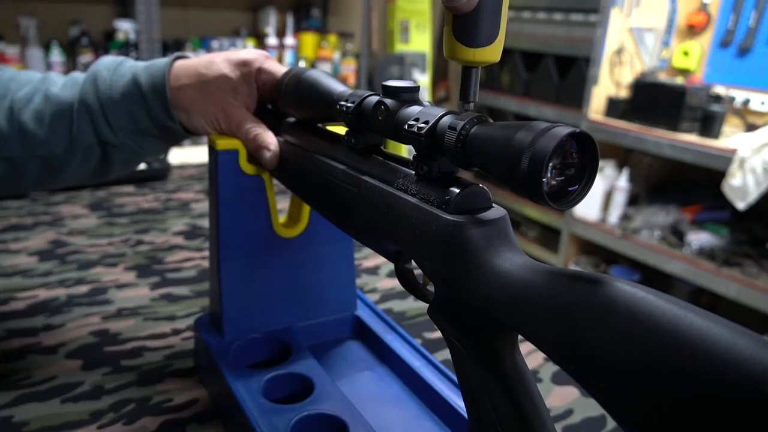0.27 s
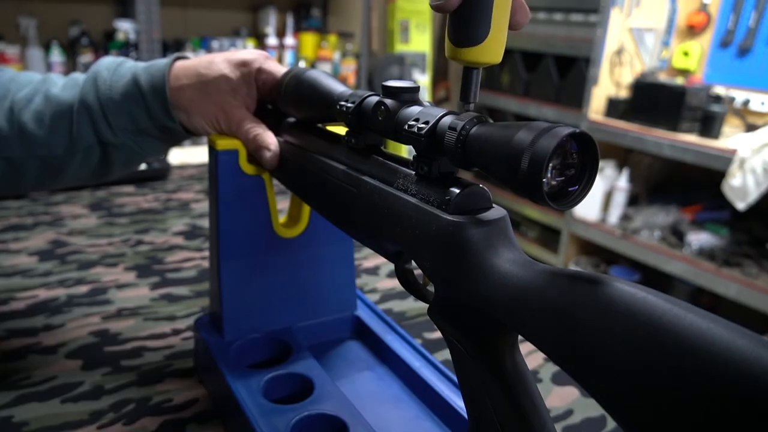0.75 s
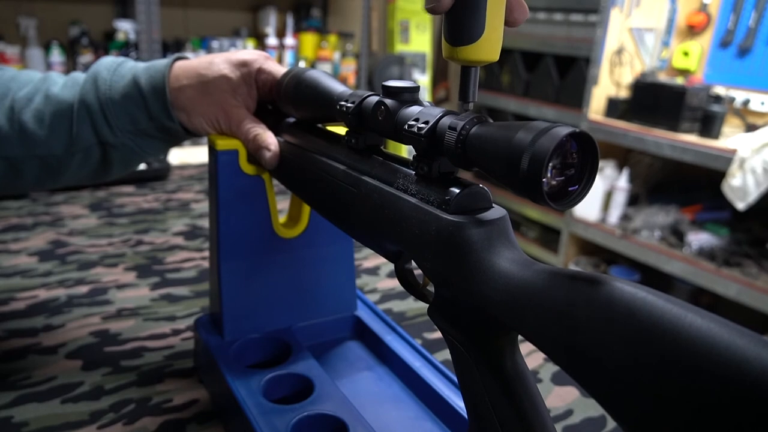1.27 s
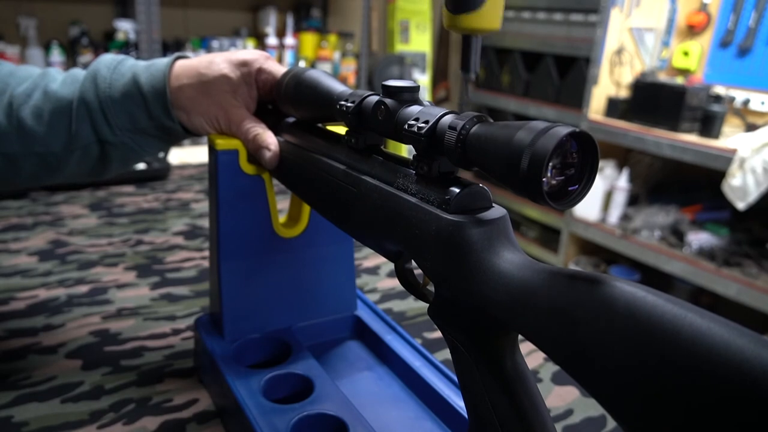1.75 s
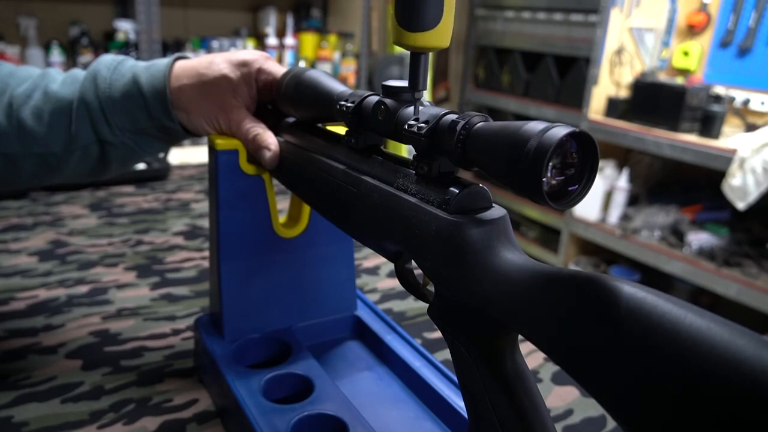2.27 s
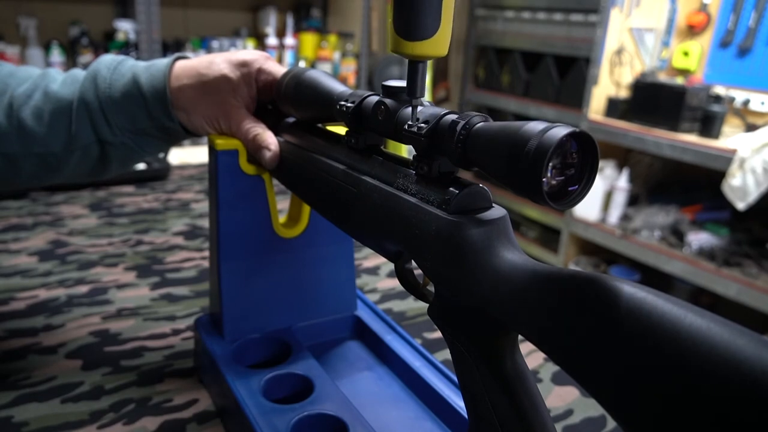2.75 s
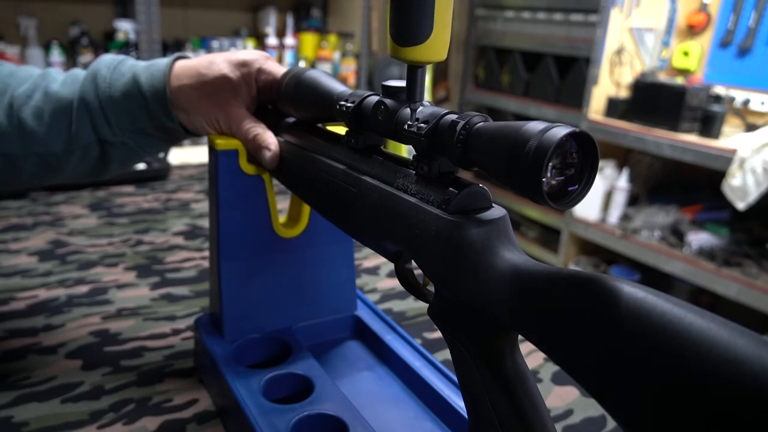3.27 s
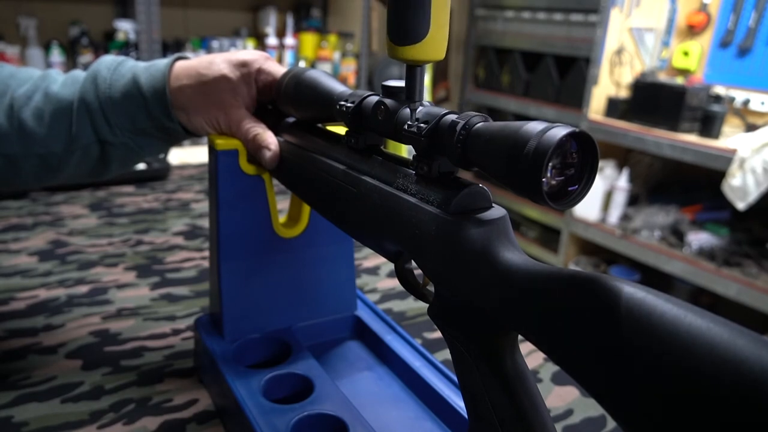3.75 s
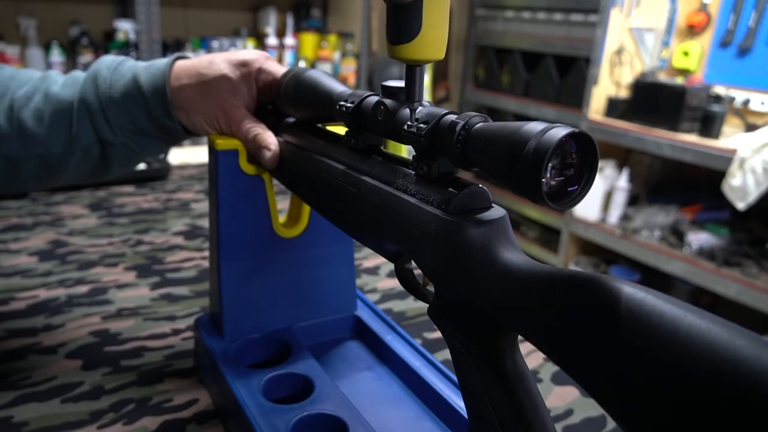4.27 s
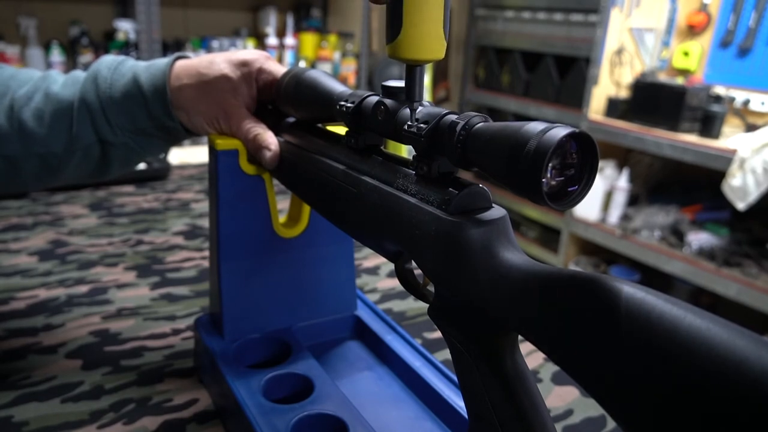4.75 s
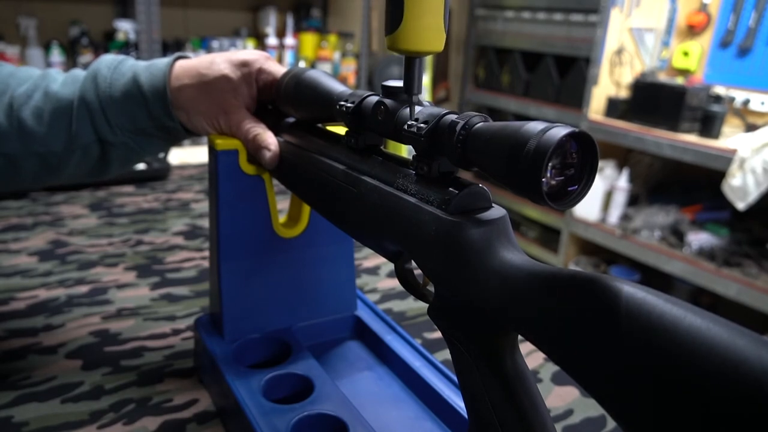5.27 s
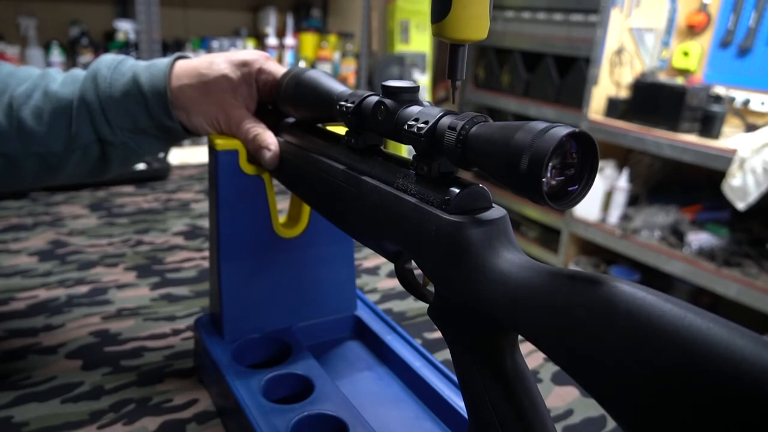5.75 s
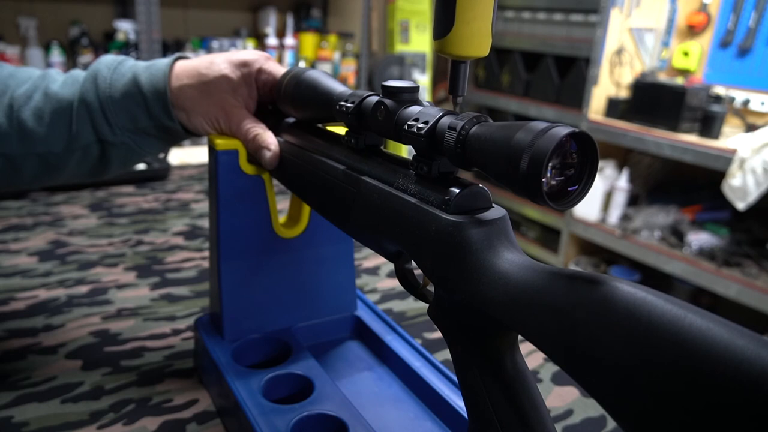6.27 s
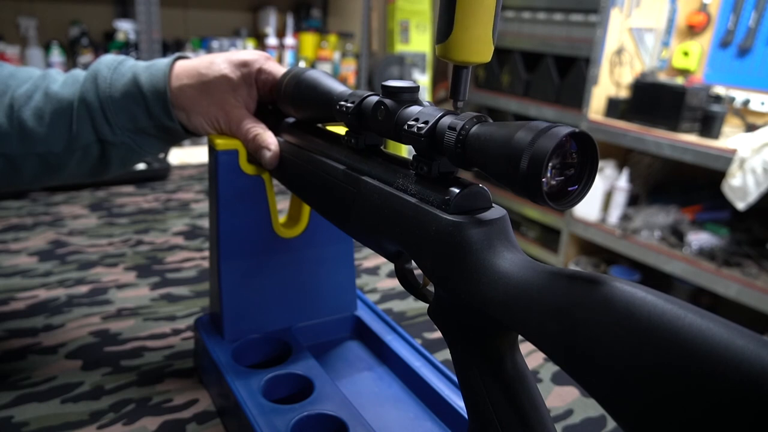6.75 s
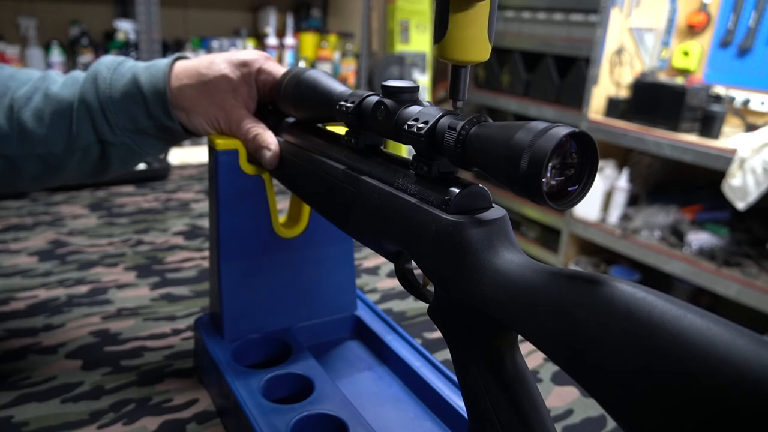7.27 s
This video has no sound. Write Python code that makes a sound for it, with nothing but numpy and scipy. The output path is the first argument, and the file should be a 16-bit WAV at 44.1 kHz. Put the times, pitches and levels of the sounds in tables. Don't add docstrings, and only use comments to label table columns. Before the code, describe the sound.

Two very loud snaps of a torque screwdriver tightening rifle scope screws, with small metallic ticks, dull bench bumps and faint distant bird chirps.

```python
import sys
import numpy as np
from scipy import signal
from scipy.fft import rfft, irfft
from scipy.io import wavfile
from scipy.ndimage import uniform_filter1d

SR = 44100
rng = np.random.default_rng(int(sys.argv[2]) if len(sys.argv) > 2 else 0)


def unload_wav(signal):
    wavfile.write(
        sys.argv[1],
        SR,
        np.round(np.clip(np.atleast_2d(signal).T, -1, 1) * 32767).astype(np.int16),
    )


def boost(x):
    u = np.asarray(x, float) / 20
    return 10 ** u


N = 331191

# (time [s], peak [dB], legs [dB], top panel [dB], tray [dB])
PUSHES = [(0.587, -36, -0.5, -16.5, -29.5), (0.719, -42.5, -9.5, -7.5, -0.5),
          (0.744, -19, -15.5, -6.5, -21), (1.479, -48.5, -2, -20, -7), (1.599, -38, -17.5, -8, -19),
          (1.637, -32.5, -18, -16.5, -24), (2.574, -47.5, -21, -6.5, -6.5), (2.985, -34, -1, -9.5, -3.5),
          (3.169, -15, -14.5, -15.5, -11.5), (3.309, -30, -31, -13, -14.5), (3.39, -39, -16, -23, -9),
          (3.538, -36.5, -3.5, -16, -2.5), (4.33, -37.5, -5.5, -14, -19), (4.479, -35, 0, -21.5, -18.5),
          (4.536, -24.5, -8, -2.5, -7.5), (5.189, -42, -23, -5.5, -15), (5.253, -43.5, -1, 1, -19),
          (6.329, -35.5, -22, -12.5, -19), (6.548, -36.5, -3, -8, -13), (6.784, -31.5, -25, -23.5, -27),
          (6.871, -47, 4, 2, -2.5), (7.081, -35.5, -22, -18, -10)]


def on_log(hz, table):
    return np.interp(np.log(hz), np.log(np.array(table)[:, 0]), np.array(table)[:, 1])


def unit(x):
    return x / np.sqrt(np.mean(x ** 2))


def filtered_noise(order, hz, kind, size):
    sos = signal.butter(order, hz, kind, fs=SR, output="sos")
    return signal.sosfilt(sos, rng.standard_normal(size))


def noise_band(hz, width_hz, size):
    return unit(signal.lfilter(*signal.iirpeak(hz, hz / width_hz, fs=SR), rng.standard_normal(size)))


def walk(rate):
    k = int(SR / rate)
    steps = np.repeat(rng.standard_normal(N // k + 1), k)
    return 0.43 * uniform_filter1d(uniform_filter1d(steps, k), k)[:N]


def ring(modes, turns, seconds):
    t = np.arange(int(seconds * SR)) / SR
    sound = 0
    for (hz, db, t60), turn in zip(modes, turns):
        fade = boost(db - 60 * t / max(t60, 0.0008))
        sound = sound + fade * np.sin(2 * np.pi * (hz * t + turn))
    return sound


def burst(lo_hz, hi_hz, t60):
    t = np.arange(int(0.12 * SR)) / SR
    band = filtered_noise(3, [lo_hz, min(hi_hz, 20000)], "band", len(t))
    return unit(band) * boost(-60 * t / max(t60, 0.002))


def add(track, s, sound):
    i = int(s * SR)
    track[i:i + len(sound)] += sound[:N - i]


def shop():
    # (frequency [Hz], density [dB per Hz])
    floor_colour = [(40, -6.5), (110, -17.5), (400, -21), (1000, -27), (1400, -28), (2400, -34),
                    (5400, -47), (16000, -42)]
    # (time [s], level [dB])
    fan_load = [(0, -2), (0.6, -6), (1.2, -1.5), (2.2, -2), (3.1, 0), (4.4, 0), (5.3, -6), (6.3, -5),
                (7.2, -5.5), (7.51, 0)]
    t = np.arange(N) / SR

    hz = np.maximum(np.fft.rfftfreq(N, 1 / SR), 1)
    colour = boost(on_log(hz, floor_colour)) * np.minimum(hz / 55, 1)
    floor = unit(irfft(rfft(rng.standard_normal(N)) * colour, N))

    dip_start_s, dip_length_s, dip_db = 0.93, 0.24, -9
    dip_end_s = dip_start_s + dip_length_s
    dip = np.clip(np.minimum((t - dip_start_s) / 0.15, (dip_end_s - t) / 0.015), 0, 1)
    whistle = noise_band(1680, 59, N) + boost(-3.5) * noise_band(1600, 380, N)
    whistle_db = -70 + dip_db * dip + walk(14)

    load_db = np.interp(t, *np.transpose(fan_load))
    hiss_hz, hunt_hz = 4340, 150
    drift = np.cos(2 * np.pi * np.cumsum(hiss_hz + hunt_hz * walk(1.5)) / SR)
    hiss = boost(0.51 * load_db) * unit(drift * filtered_noise(2, 130, "low", N))
    hiss = hiss + boost(0.5) * noise_band(3650, 730, N) + boost(-7.5) * noise_band(3200, 500, N)
    hiss_db = -75 + load_db + 2.1 * walk(3.8)
    return boost(-65) * floor + boost(whistle_db) * whistle + boost(hiss_db) * hiss


def sway():
    rise_s, t60_s, rest_db, push_gain_db = 0.03, 0.99, -66, -40.5
    t, force = np.arange(SR) / SR, np.zeros(N)
    for s, db, legs_db, *_ in PUSHES:
        fade = boost(db + legs_db + 31.5 - 60 * t / t60_s)
        add(force, s, fade * (1 - np.exp(-t / rise_s)))
    low = signal.butter(3, 34, fs=SR, output="sos")
    rocking = signal.sosfilt(low, noise_band(5.3, 40, N))
    return (boost(rest_db) + boost(push_gain_db) * force) * unit(rocking)


def rustles():
    # (time [s], rms [dB], length [s], low edge [Hz], high edge
    # [Hz])
    patches = [(0, -66.5, 0.39, 1230, 1500), (3.007, -91, .06, 5000, 11000),
               (3.178, -54.5, 0.14, 700, 1350), (2.557, -62.5, 0.079, 297.4, 1100),
               (4.309, -60.5, 0.055, 303, 780), (6.336, -61, 0.037, 700, 1395),
               (6.765, -56, 0.062, 348, 770), (3.296, -76.5, 0.047, 3020, 11200),
               (3.36, -75.5, 0.044, 7000, 12000), (3.386, -61, 0.055, 298, 950),
               (3.46, -66.5, 0.1, 303, 900), (3.628, -77, .03, 5000, 11000),
               (3.728, -77.5, 0.05, 5000, 12000), (3.719, -69, 0.044, 300, 795),
               (5.551, -75, 0.17, 3400, 4800), (6.101, -76, 0.11, 3995, 10940),
               (6.551, -71.5, 0.12, 277, 600), (6.638, -69, 0.056, 2200, 9000),
               (6.864, -71, .06, 3000, 6960), (6.934, -66, 0.074, 275, 700),
               (7.027, -74.5, 0.071, 3000, 11000), (7.38, -72, 0.098, 3280, 5200)]
    out = np.zeros(N)
    for s, db, length, lo_hz, hi_hz in patches:
        n = int(length * SR)
        grain_db = 2.2 * np.repeat(rng.standard_normal(n // 90 + 1), 90)[:n]
        grains = rng.standard_normal(n) * boost(grain_db)
        sos = signal.butter(2, [lo_hz, hi_hz], "band", fs=SR, output="sos")
        swell = np.sin(np.pi * np.linspace(0, 1, n) ** 0.62) ** 2
        add(out, s, boost(db) * unit(signal.sosfilt(sos, grains)) * swell)
    return out


def bench():
    # (time [s], peak [dB])
    nudges = [(0.081, -55.5), (0.357, -59), (1.296, -47), (2.63, -44), (2.75, -45), (2.875, -64),
              (3.777, -58), (3.883, -56.5), (4.047, -46.5), (4.243, -55.5), (4.901, -59), (5.062, -48.5),
              (6.494, -42.5), (6.661, -47), (6.701, -46), (6.941, -39.5), (7.01, -40), (7.228, -47),
              (7.366, -45.5)]
    # (legs [dB], top panel [dB], tray [dB])
    nudge_parts_db = (-11.5, -16, -16)
    # (frequency [Hz], level [dB], t60 [s])
    leg_modes = [(52.13, 1, 0.45), (83, -5.5, 0.78)]
    panel_modes = [(133.7, 0.011, .45)]
    tray_modes = [(223.7, 2, 0.29), (165, -8.5, 0.52), (277.2, -13, 0.25)]
    bench_hz, bench_t60_s = 100.5, 0.4
    out = np.zeros(N)
    rows = list(PUSHES) + [(s, db, *nudge_parts_db) for s, db in nudges]
    for (s, db, *parts_db), u in zip(rows, rng.random((len(rows), 6))):
        dip_s = np.clip(0.098 + 0.001 * (db + 40), 0.05, 0.2)
        split = 0.5 / dip_s
        modes = [(bench_hz - split, 0, bench_t60_s), (bench_hz + split, 1.5, 0.46 * bench_t60_s)]
        for part, part_db in zip((leg_modes, panel_modes, tray_modes), parts_db):
            modes += [(hz, g + part_db, t60) for hz, g, t60 in part]
        thud = ring(modes, [0, 0.5, *(np.round(u) / 2)], 0.6)
        build = 1 - np.exp(-np.arange(len(thud)) / (0.02 * SR))
        add(out, s - 0.004, boost(db) * thud * build)
    return out


def ticks():
    # (time [s], peak [dB], main pitch [Hz], wooden knock [dB], bright edge [dB])
    contacts = [(0.572, -39, 2624, -0.5, -8.5), (1.2784, -67, 4220, -7, -16), (1.6145, -42, 2490, -11, -44),
                (2.5595, -59.5, 3180, 8.5, -28.5), (2.9851, -44, 2550, -1, -11.5),
                (3.1717, -28, 2023, 1.5, -49), (3.3142, -61, 4470, 4, -21), (3.336, -55.5, 3260, 1, -14),
                (3.5242, -51, 4300, -1, -21), (4.1944, -67, 4126, -4, -12), (4.3301, -71, 4750, 9, -21),
                (4.474, -71, 4510, 19.5, -17), (5.251, -53.5, 2455, 0, -24.5),
                (6.3166, -49.5, 2845, -2.5, -26.5), (6.334, -55, 3690, 9, -17),
                (6.6448, -54.5, 2850, -2.5, -15), (6.7284, -64, 2860, -14.5, -19),
                (6.749, -60, 4400, -17, -23), (6.757, -50.5, 4200, -17, -30), (6.779, -59, 2070, 15.5, -30),
                (6.8392, -54, 2030, 0.5, -16), (7.0753, -52, 4540, 0, -24)]
    # (multiple of main pitch, level [dB])
    bit_modes = [(1, 4), (1.451, -6.5)]
    # (frequency [Hz], level [dB], t60 [s])
    knock_modes = [(292, 5, 0.08), (480, 6, .07), (600, -3, 0.069), (820, 2, 0.035), (1130, -3.5, 0.069),
                   (1426.4, -4.5, .03)]
    edge_modes = [(6450, 0, .006), (9300, 1, .008), (10700, 4, 0.0086)]
    # (time [s], frequency [Hz], level [dB], t60 [s])
    ping = (1.6147, 2500, -55, 0.1)
    t60, top_hz = 0.02, 4700
    out = np.zeros(N)
    add(out, ping[0], ring([ping[1:]], [0], 0.2))
    for (s, db, hz, knock_db, edge_db), chance in zip(contacts, rng.random((len(contacts), 3, 6))):
        add(out, s, boost(db - 1) * burst(1600, 1900 + 0.9 * hz, 0.6 * t60))
        pitched = [(min(hz * k, top_hz), g, 1.2 * t60) for k, g in bit_modes]
        add(out, s, boost(db - 8) * ring(pitched, chance[0], 0.1))
        add(out, s, boost(db + edge_db + 7) * burst(4200, 13000, 0.3 * t60))
        add(out, s, boost(db + edge_db - 8.5) * ring(edge_modes, chance[1], 0.03))
        wood = [(f * (0.9 + 0.087 * u), g, d) for (f, g, d), u in zip(knock_modes, chance[2])]
        add(out, s + 0.0028, boost(db + knock_db - 11) * ring(wood, np.round(chance[0]) / 2, 0.17))
        add(out, s + 0.0022, boost(db + knock_db - 6.5) * burst(250, 1900, 0.06))
    return out


def clutch():
    # (time [s], peak [dB], ring of scope [dB], knock of stock [dB])
    releases = [
        (0.7364, 2, -32.5, -27.5),
        (4.5305, 2, -32.5, -29.5),
    ]
    # (frequency [Hz], width [Hz], level [dB])
    shell_modes = [(2520, 190, -2), (3720, 300, 1.5), (4230, 170, -4.5), (4800, 89, -8), (5200, 190, -14.5),
                   (6150, 210, -13.5)]
    # (frequency [Hz], level [dB], t60 [s])
    scope_modes = [(452, -5, .18), (587, -4, .16), (760, -13, .15), (1150, -4, .28), (1680, 0, .24),
                   (2021, -2, .2), (2095, -6, .2), (2340, -5, .18)]
    bang_modes = [(540, -25, 0.004), (1100, -20, .006), (1710, -12.5, 0.00095), (2570, 1, 0.0021),
                  (3750, 0.5, 0.0025), (5200, -11, 0.0018), (9000, -20.5, 0.00091)]
    out, bang = np.zeros(N), np.zeros(N)
    shell = [(hz, db, np.log(1000) / (np.pi * 1.3 * width)) for hz, width, db in shell_modes]
    for (s, db, ring_db, knock_db), turns in zip(releases, rng.random((len(releases), 8))):
        crack = -ring(shell, np.zeros(len(shell)), 0.05)
        crack = uniform_filter1d(crack, size=6)
        add(out, s + 0.0012, boost(db + 1) * crack / np.abs(crack).max())
        add(out, s + 0.001, boost(db - 10.5) * burst(2300, 4600, 0.028))
        add(out, s + 0.001, boost(db - 17) * burst(4400, 9500, 0.014))
        add(out, s + 0.001, boost(db - 40.5) * burst(13000, 15000, 0.01))
        add(out, s + 0.0043, boost(db + knock_db) * burst(470, 720, 0.023))
        add(out, s + 0.0026, boost(db + ring_db + 3.5) * ring(scope_modes, turns, 0.69))
        add(bang, s + 0.001, boost(db - 2) * ring(bang_modes, np.zeros(len(bang_modes)), 0.02))
    return out, bang


def room(x, diffuse, wet_db):
    # (frequency [Hz], t60 [s])
    decay = [(200, 0.3), (500, 0.4), (1000, 0.42), (2000, 0.5), (3500, 0.54), (6000, 0.38), (10000, 0.36),
             (15000, .15)]
    # (frequency [Hz], level [dB])
    tail_colour = [(200, 6), (600, -2.5), (1500, -11.5), (3000, -1.5), (6000, -3.5), (10000, -0.5),
                   (15000, -11.5)]
    # (delay [s], level [dB])
    echoes = [(.0062, -17.5), (.0095, -21), (0.0151, -19)]
    t = np.arange(int(0.7 * SR)) / SR
    tail = 0
    for hz in 200 * 2 ** np.arange(0, 6.4, 1 / 3):
        third = filtered_noise(2, [hz / 1.125, hz * 1.125], "band", len(t))
        tail = tail + boost(on_log(hz, tail_colour) - 60 * t / on_log(hz, decay)) * third
    early_db, early_s = 7.5, 0.021
    tail = boost(wet_db - 7.5 + early_db * np.exp(-t / early_s)) * tail
    tail = tail * np.clip((t - 0.003) / 0.0093, 0, 1)
    shelves = np.zeros(int(0.03 * SR))
    for s, db in echoes:
        add(shelves, s, boost(db) * np.array([0.25, 0.5, 0.25]))
    return x + signal.fftconvolve(x, shelves)[:N] + signal.fftconvolve(diffuse, tail)[:N]


def bird():
    # (start [s], top of pitch arc [s], end [s], top pitch [Hz], level [dB])
    chirps = [
        (2.16, 2.145, 2.23, 2760, -65.5),
        (5.618, 5.638, 5.75, 2900, -63.5),
        (7.41, 7.475, 7.55, 2830, -63),
    ]
    # (start [s], end [s], start pitch [Hz], end pitch [Hz], level [dB])
    lead_ins = [(2.12, 2.142, 3470, 3070, -59), (2.152, 2.165, 3040, 3180, -63),
                (5.598, 5.64, 3750, 3670, -70.5), (7.378, 7.41, 3790, 3530, -70.5),
                (7.408, 7.463, 3200, 3300, -68.5)]
    # (multiple, level [dB])
    overtones = [(1, 5), (2, -3.5), (3, -19)]
    attack_s, release_s, warble_hz = 0.006, 0.066, 110
    t = np.arange(N) / SR
    warble, out = warble_hz * walk(80), np.zeros(N)
    notes = []
    for s, top, end, hz, db in chirps:
        arch = np.interp(t, [top - 0.05, top, top + 0.04], [1 - 0.05, 1, 1 - 0.09])
        notes.append((s, end, db, overtones, hz * arch))
    for s, end, a_hz, b_hz, db in lead_ins:
        notes.append((s, end, db, overtones[:1], np.interp(t, [s, end], [a_hz, b_hz])))
    for s, end, db, orders, hz in notes:
        phase = 2 * np.pi * np.cumsum(hz + warble) / SR
        fall = (end - t) / min(release_s, (end - s) / 2)
        fade = np.clip(np.minimum((t - s) / attack_s, fall), 0, 1)
        out += fade * boost(db) * sum(boost(g) * np.sin(k * phase) for k, g in orders)
    return out * boost(4 * walk(69))


def scene():
    (snap, bang), taps, song = clutch(), ticks(), bird()
    direct = snap + taps + boost(-5.5) * song
    diffuse = bang + boost(-4.5) * taps + song
    air = room(direct, diffuse, wet_db=-26)
    return (air + rustles() + bench() + sway() + shop())[None]


def low_pass(x):
    return signal.sosfilt(signal.butter(12, 16400, fs=SR, output="sos"), x)


def record(dry):
    dull = signal.sosfilt(signal.butter(1, 13000, fs=SR, output="sos"), dry)
    duck_db, duck_s = -1, 0.16
    keep = np.exp(-1 / (duck_s * SR))
    heard = signal.lfilter([1 - keep], [1, -keep], dull ** 2)
    levelled = dull * boost(-duck_db * heard / (heard + boost(-83.5)))
    top_hz = 15900
    cut = signal.sosfilt(signal.ellip(8, 0.2, 70, top_hz, fs=SR, output="sos"), levelled)
    return low_pass(np.clip(cut, -1, 1))


dry = scene()
out = record(dry)
unload_wav(out)
```